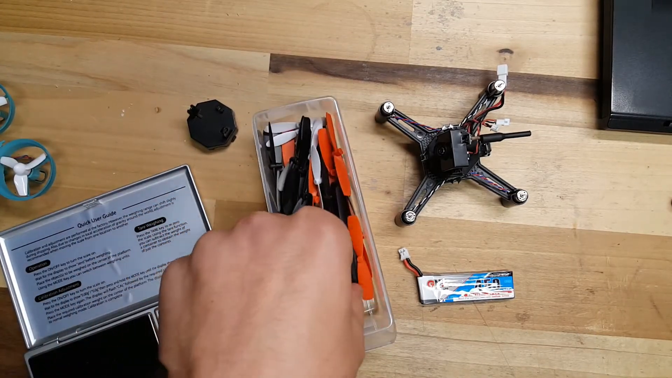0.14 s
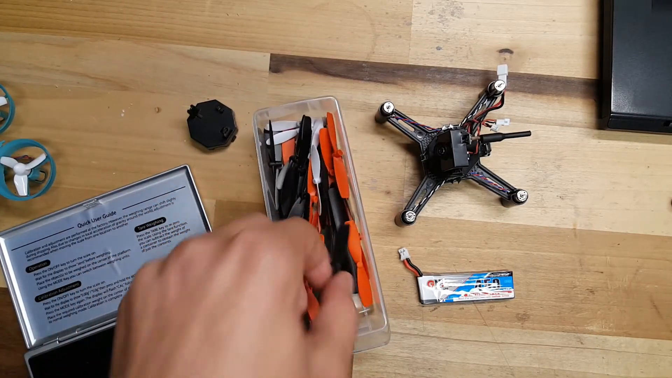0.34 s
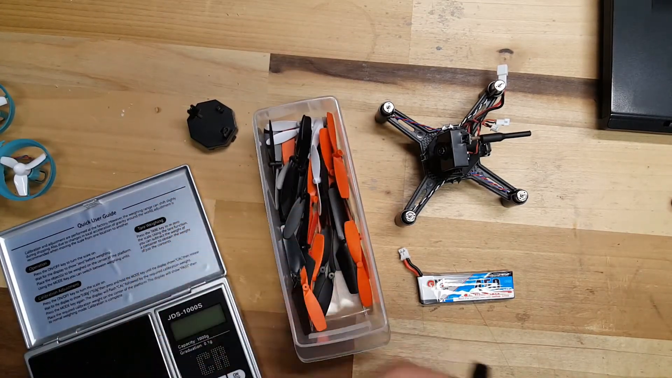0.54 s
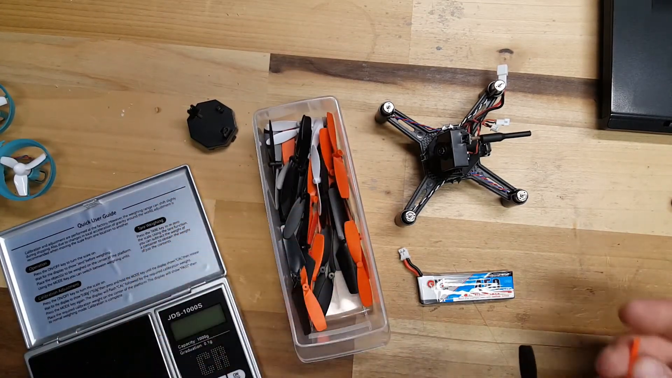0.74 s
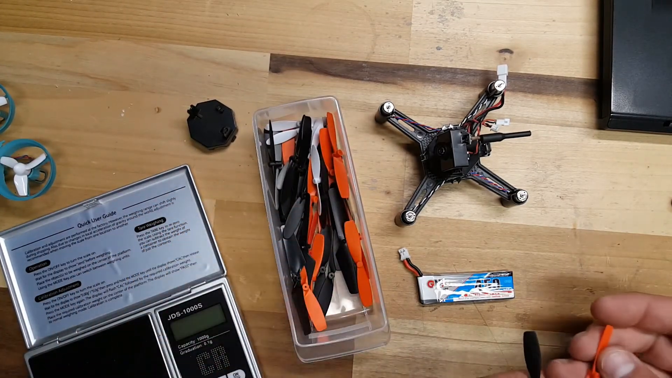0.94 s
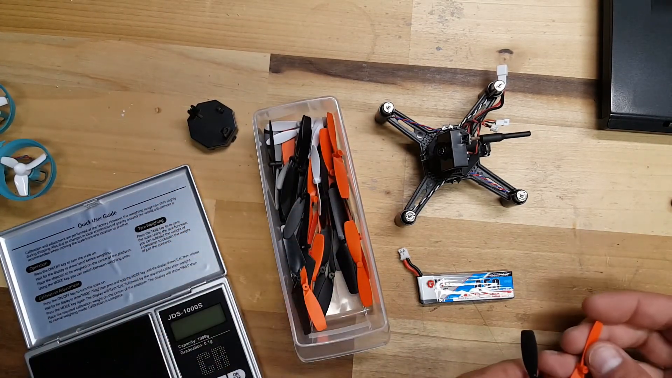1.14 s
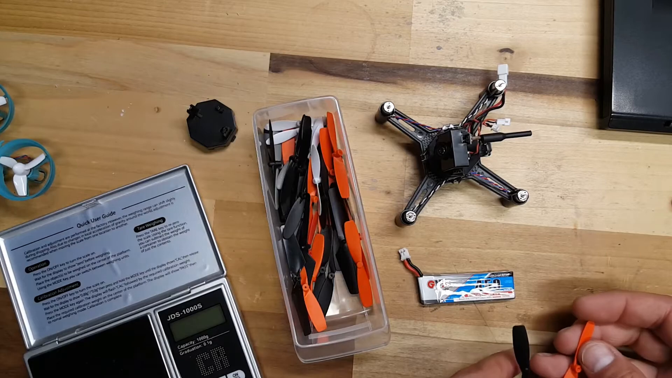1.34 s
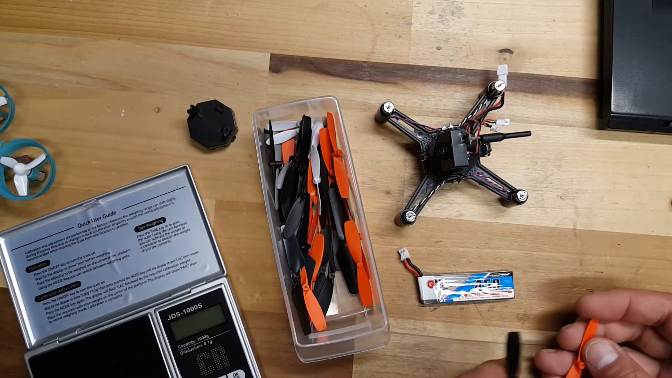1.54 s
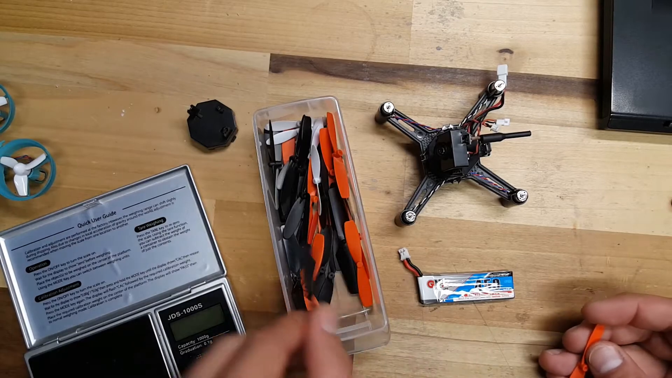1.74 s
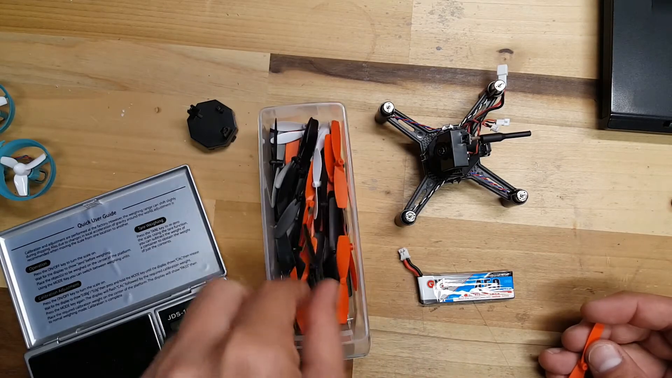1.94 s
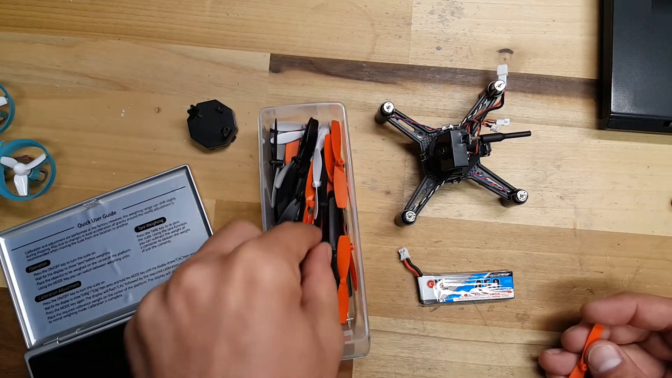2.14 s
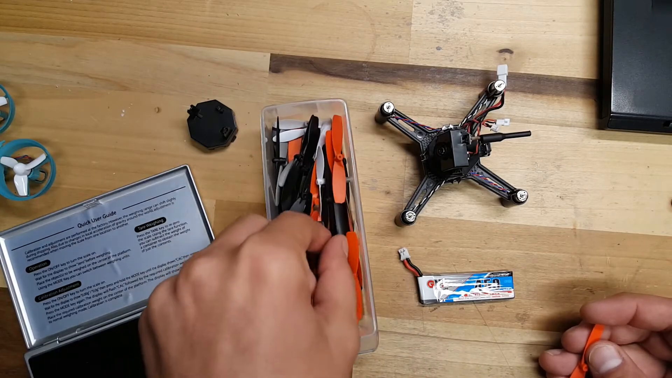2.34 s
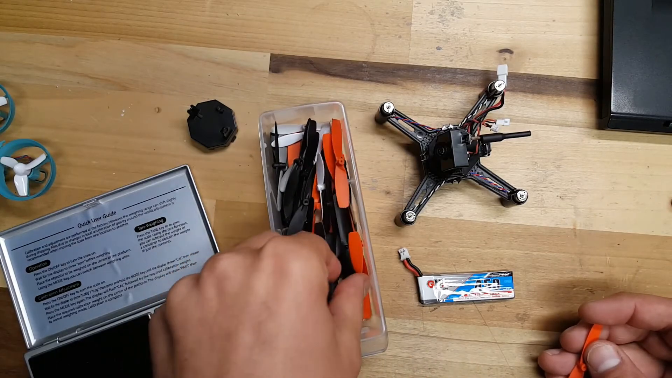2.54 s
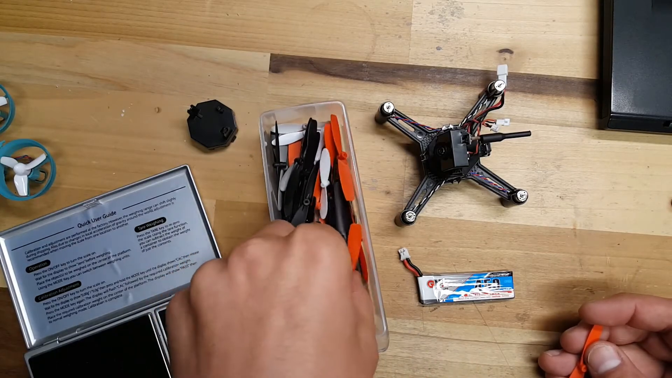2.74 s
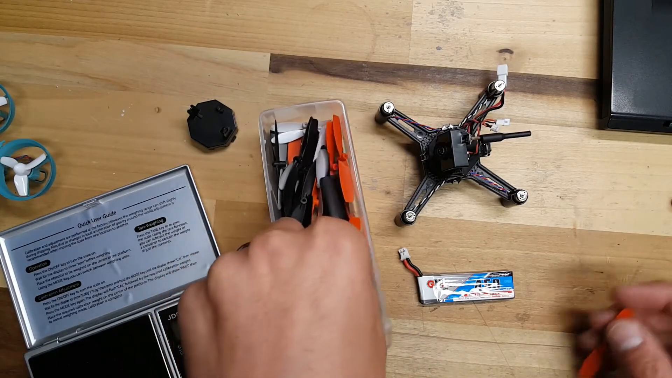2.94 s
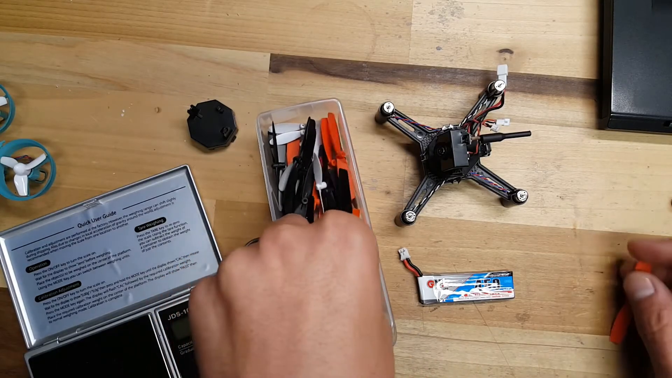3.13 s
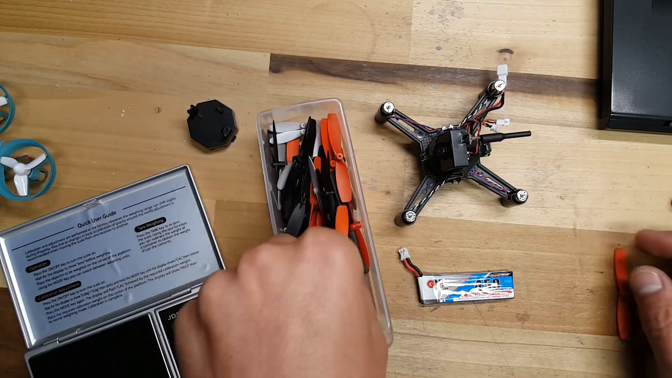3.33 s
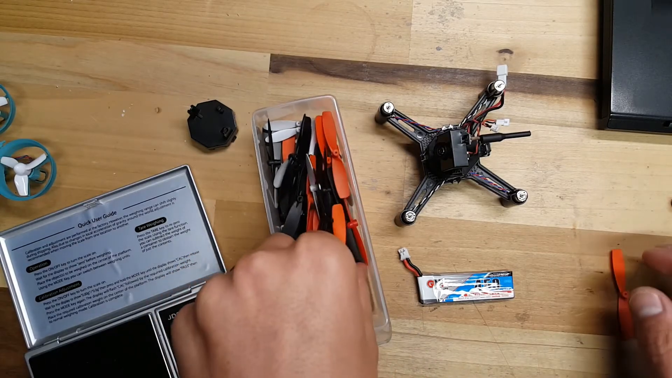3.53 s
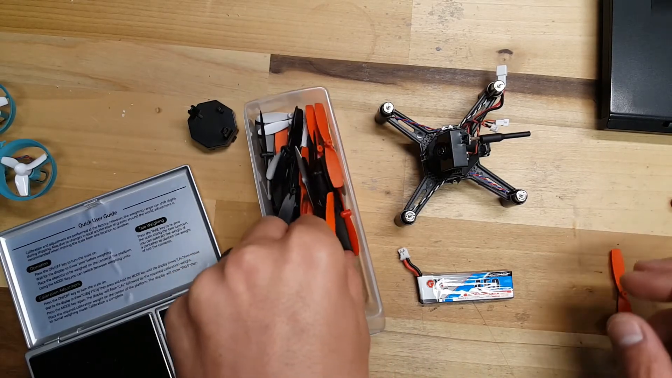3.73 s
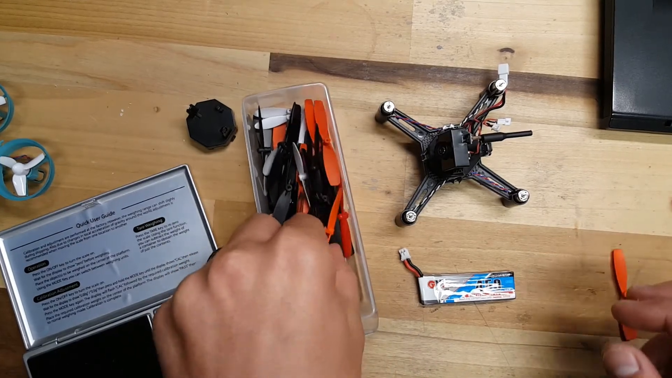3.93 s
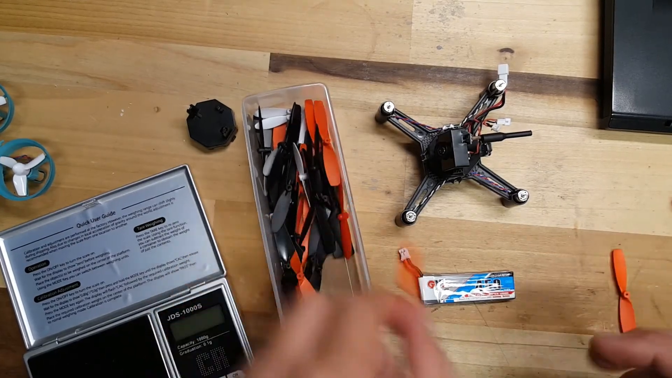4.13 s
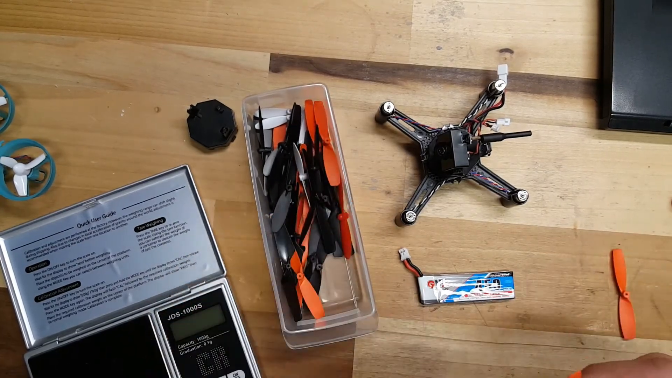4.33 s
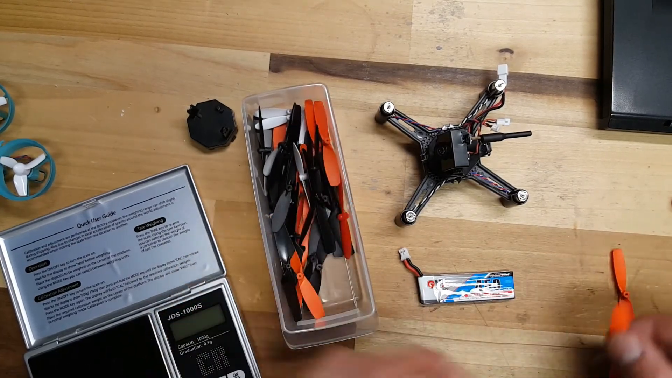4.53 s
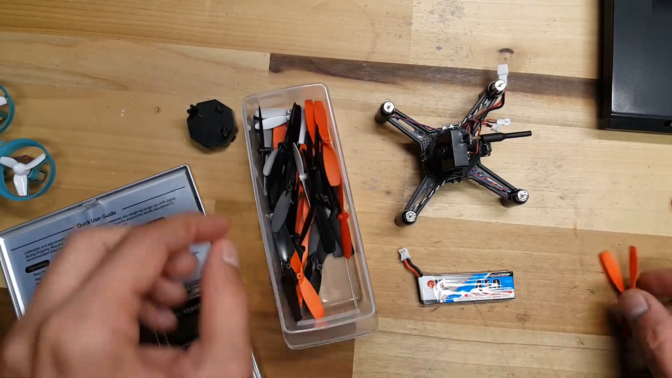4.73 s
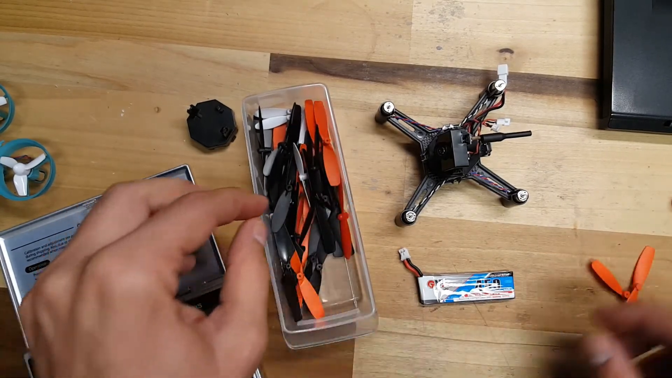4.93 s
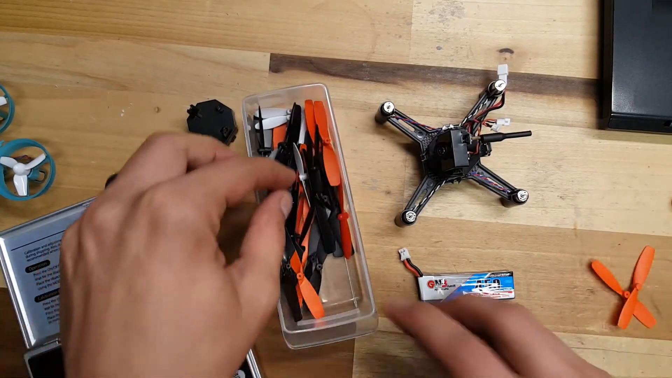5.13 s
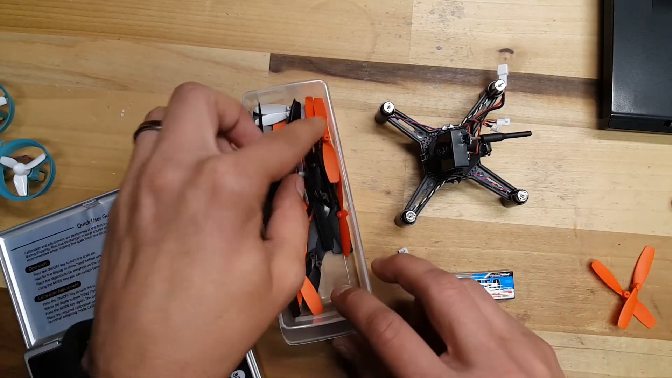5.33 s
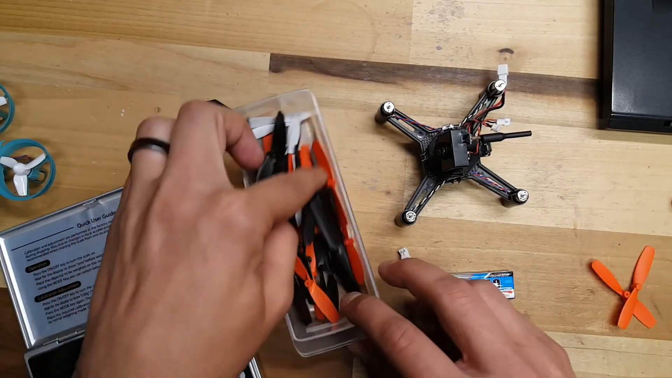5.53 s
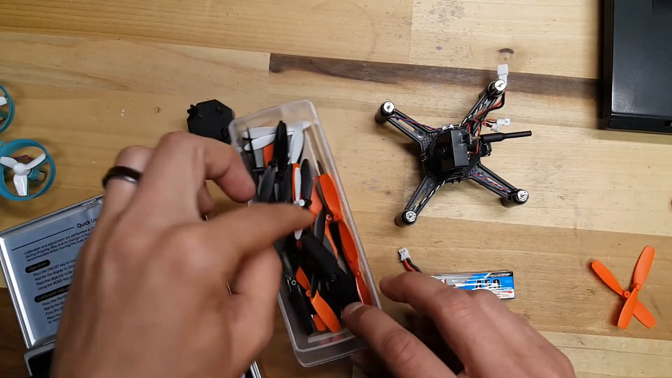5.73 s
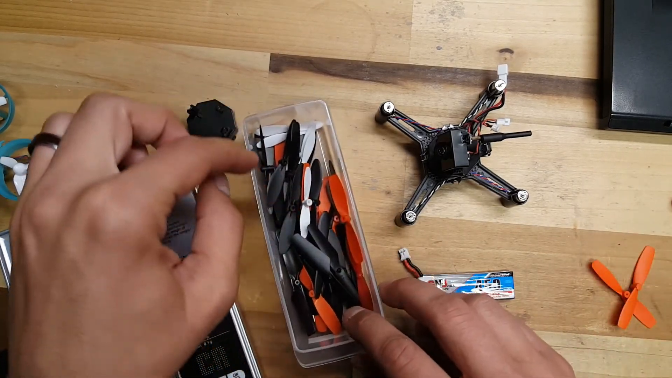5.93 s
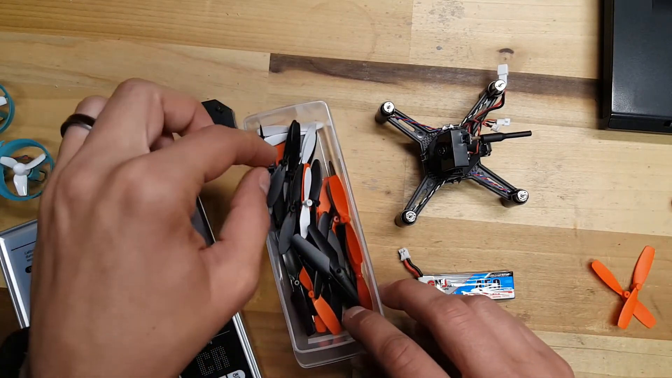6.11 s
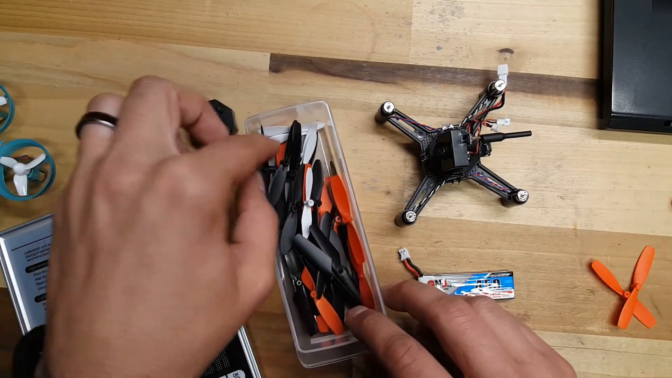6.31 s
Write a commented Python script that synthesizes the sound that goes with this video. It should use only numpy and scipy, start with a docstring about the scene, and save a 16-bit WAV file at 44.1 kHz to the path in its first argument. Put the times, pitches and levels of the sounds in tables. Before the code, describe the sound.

Close stereo pickup in a small quiet room with low rumble and a barely audible ticking fan. Thin plastic propellers click and scrape sharply at once, then pause. A longer busy sorting follows, with brittle clicks, short rasps, hollow box knocks and soft rubbing on the wooden bench. After another pause come a few faint touches, then a final lively flurry that thins out.

```python
"""A small room rumbles low and a distant fan ticks faintly throughout: shaped noise and repeating rattle.
At once, fingers sort small plastic propellers in a thin plastic box on a wooden workbench: blades scrape
(many tiny catches), click (short filtered noise hits) and knock the box (ringing modes), then pause.
From about 1.7 s to 4.1 s they sort busily, the box rubs along the bench and a low hum swells and fades.
A few touches follow near 4.7 s and a last flurry from 5.3 s; two close ports hear it, the left one first."""
import sys
import numpy as np
from scipy import signal
from scipy.fft import rfft, irfft
from scipy.io import wavfile
from scipy.ndimage import uniform_filter1d

SR = 44100
rng = np.random.default_rng(int(sys.argv[2]) if len(sys.argv) > 2 else 0)


def to_wav(sig):
    """Store sig (one row per channel, or 1-D mono) as 16-bit WAV at the path in sys.argv[1].

    Samples outside -1..1 are clipped; the rate is SR.
    """
    pcm = np.clip(np.atleast_2d(sig), -1, 1) * 32767
    pcm = np.round(pcm).astype(np.int16)
    wavfile.write(sys.argv[1], SR, pcm.T)  # frames by channels


N = 285327
TIME = np.arange(N) / SR

# Levels in these tables are relative: a layer's own gain may shift them all together.
# background air noise, its colour: pitch_hz, level_db
AIR_COLOUR = [(110, -20), (180, 0), (230, -5), (280, -3), (450, -14), (600, -11), (800, -13), (1400, -17),
              (2200, -22), (3500, -25), (5000, -32), (7500, -33), (9500, -37), (16000, -35)]
# background rumble, its colour: pitch_hz, level_db
RUMBLE_COLOUR = [(15, -2), (35, -15.5), (55, 4.5), (75, 7.5), (95, 4), (122, 6), (150, -6.5), (200, -34),
                 (300, -45)]
AIR_DB, RUMBLE_DB = -65, -58
# how alike the background is at left and right: pitch_hz, likeness (0 to 1)
LIKENESS = [(60, 1), (150, .93), (400, 0.6), (1000, 0.08), (3000, 0.13), (12000, 0.026)]
# steady whines in the background: pitch_hz, width_hz, level_db
WHINES = [(261, 15, -77.5), (562, 24, -85), (1168, 75, -77.5), (1498, 160, -76), (6960, 300, -90)]
# a low hum swells and fades: time_s, level_db
HUM_LEVEL = [(1.8, -85), (2.45, -55), (2.9, -59), (3.25, -69)]
HUM_HZ = 117.8
# ticks in each turn of the fan: share_of_turn (0 to 1), level_db
FAN_TICKS = [(.4, -1), (.92, 0)]
# ringing of the fan's housing: pitch_hz, width_hz, level_db
FAN_RINGS = [(1230, 54, -24), (1710, 51, 3.5), (2400, 340, 1.5), (3300, 430, 1.5)]
# a finger pushes blades over each other: start_s, length_s, level_db, swell_db (from start to end)
SLIDES = [ (0.0, 0.083, -46, 0), (0.024, 0.069, -55.5, 9), (0.167, 0.051, -52, 11),
          (1.678, 0.21, -61, 16.5), (1.892, 0.057, -44.5, -8), (1.95, 0.019, -57, -17),
          (2.194, 0.036, -43.5, 8.5), (2.257, 0.041, -48.5, 7), (2.461, 0.016, -46, -3),
          (2.506, 0.028, -45, 4), (2.574, 0.14, -44, 11.5), (2.731, 0.081, -51, 15), (2.859, 0.087, -60, 9),
          (2.956, 0.032, -41, 5.5), (3.013, 0.084, -53, -6), (3.127, 0.034, -44, 23),
          (3.261, 0.024, -54.5, 16), (3.287, 0.063, -43, -4.5), (3.417, 0.033, -40.5, 10),
          (3.467, 0.016, -40, -3), (3.582, 0.08, -52, 3), (3.69, 0.076, -51.5, 8),
          (3.806, 0.027, -46.5, 12), (3.856, 0.012, -42.5, 0.5), (3.911, 0.017, -42, -9),
          (3.981, 0.025, -48.5, -4), (5.286, 0.039, -59.5, 15), (5.361, 0.042, -43, 7.5),
          (5.41, 0.049, -44, -9), (5.466, 0.085, -36, 2.5), (5.581, 0.053, -40.5, 10),
          (5.645, .08, -48.5, 5), (5.774, 0.038, -49, 2), (5.81, .012, -41, 5.5), (6.392, .07, -51.5, 20)]
# colour of a slide: pitch_hz, level_db
SLIDE_COLOUR = [(300, -10), (800, -8), (1250, -5.5), (2000, -1), (3300, -3), (4300, -5.5), (6000, -7),
                (7500, -7.5), (9000, -20.5), (10500, -23), (12000, -20), (16000, -26.5)]
# resonances of the heap of blades in its box: pitch_hz, width_hz, boost_db
HEAP = [(1618, 39, 7.5), (2106, 120, 3.5), (2620, 110, 3.5), (2790, 150, 1), (3240, 300, 6),
        (3320, 220, 0.5), (3780, 110, 1.5), (4730, 110, 7)]
# blade hits blade: start_s, level_db, pitch_hz (strongest mode), treble_db (extra), edge_tick_db
CLICKS = [ (0.0483, -35.5, 3530, -7, -43.5), (0.0506, -28.5, 4950, 2, -47), (0.072, -44, 3260, -3, -66),
          (0.1928, -38.5, 3180, 2, -53), (1.8948, -34, 1290, 7, -46), (1.8988, -23, 1350, -6.5, -58),
          (1.9098, -38, 3440, 0, -56), (1.9427, -29, 3440, 5.5, -43), (1.944, -27.5, 2070, -4.5, -62),
          (2.209, -45.5, 3230, 15, -56), (2.23, -31, 1710, 0, -47), (2.243, -37.5, 1560, -11, -50),
          (2.306, -46, 1530, -3, -59), (2.466, -44, 1220, -2, -67), (2.504, -28, 3560, -0.5, -46),
          (2.5165, -30.5, 2140, 0, -57), (2.531, -32.5, 2140, 4, -54), (2.668, -39.5, 3520, 5, -58),
          (2.686, -34, 3680, 9, -54), (2.702, -38, 3190, -2, -60), (2.777, -42, 3570, 8, -67),
          (2.8196, -31, 1770, -1.5, -44.5), (2.969, -44, 1700, -1, -56), (2.978, -44, 3230, 20, -53),
          (3.085, -42, 1570, 5, -70), (3.117, -46, 2080, -13, -74), (3.158, -31.5, 1630, 4, -43.5),
          (3.225, -46, 3160, -7, -78), (3.2922, -40.5, 3130, 8, -50.5), (3.331, -40.5, 3430, 1, -67),
          (3.351, -40.5, 2250, -14, -74), (3.422, -42, 3230, 4, -62), (3.438, -43, 2080, -5, -54),
          (3.4686, -31, 1940, -3, -48), (3.514, -39, 2190, -3, -61), (3.56, -42.5, 3200, -4, -65),
          (3.7333, -44, 3200, -5, -55), (3.8519, -37, 1600, -1, -49), (3.913, -39, 3240, 5, -51),
          (3.928, -40.5, 1490, -5, -54), (4.0249, -44.5, 1450, 3, -57), (4.713, -56.5, 3900, 1, -64),
          (4.7825, -47.5, 4200, 9, -49.5), (5.405, -37, 3100, 2, -59), (5.434, -38.5, 1780, -2, -61),
          (5.462, -38, 1660, 12, -49), (5.475, -35.5, 2860, -21, -54), (5.49, -33.5, 3030, 18, -59),
          (5.511, -32.5, 4000, 26, -55), (5.519, -31.5, 3140, 6.5, -52), (5.543, -46, 2090, -2, -53),
          (5.624, -39, 1630, -3, -60), (5.677, -40.5, 1460, -1, -60), (5.7143, -44.5, 1570, 8, -52.5),
          (5.81, -37, 2080, 4, -46), (5.868, -47, 2040, -5, -71), (6.433, -46, 2300, 16, -65),
          (6.464, -40, 3250, 18, -57)]
# colour of a blade click: pitch_hz, level_db
CLICK_COLOUR = [(300, -17), (800, -15), (1300, -9.5), (2000, -5.5), (2700, -4), (3400, -4), (4200, -5),
                (5000, -5), (6000, -7), (7500, -5.5), (9000, -30), (16000, -36.5)]
# colour of the crisp edge tick in a click: pitch_hz, level_db
TICK_COLOUR = [(3000, -32), (8000, 4), (10000, -5.5), (12000, 0), (14000, -3), (16000, -5)]
# the box wall or bottom is bumped: start_s, level_db, hardness_db (applied partly, most in the upper modes)
KNOCKS = [ (0.049, -38.5, 18), (0.071, -46, -1), (0.2418, -45, -5), (1.838, -51.5, -1), (1.8956, -24.5, 22),
          (1.9075, -35.5, -1), (1.9449, -38.5, 31), (2.239, -44.5, -4), (2.4625, -39.5, 6),
          (2.5512, -38.5, -8), (2.817, -46.5, 4), (2.998, -48.5, -16), (3.292, -45, 18), (3.4365, -33.5, 3),
          (3.444, -44, 42), (3.47, -47, 2), (3.556, -40, -2), (3.668, -48.5, -18), (4.026, -47, 25),
          (4.742, -56, 8), (4.763, -52.5, 8), (4.782, -60, 9), (5.314, -49.5, -25), (5.33, -48, -23),
          (5.4, -44.5, 3), (5.49, -53, -3), (5.912, -53, -9), (5.98, -53, -15), (6.334, -54, -2),
          (6.431, -49, 12)]
# modes of the box on the bench: pitch_hz, level_db, t60_s (time to fall by 60 dB)
BOX_MODES = [(183, -11.5, 0.12), (387.4, -25, 0.48), (461.3, -6, 0.12), (585.7, -1.5, 0.095),
             (668, -5.5, 0.049), (763, -9, 0.093), (933, -6.5, 0.028), (1066, -2.5, 0.033),
             (1340, 6, 0.015), (1580, -8, 0.029), (2030, -7, 0.046), (2130, -11.5, 0.036)]
# colour of the box's dull crack and of its rub: pitch_hz, level_db
BOX_COLOUR = [(100, -8.5), (250, -15), (450, -1), (600, -5), (850, -3), (1300, -10), (2200, -15),
              (4000, -13), (9000, -76)]
# the box is shoved along the bench: start_s, length_s, level_db
DRAGS = [ (2.464, 0.023, -45.5), (2.538, 0.042, -53), (2.804, 0.02, -47), (2.965, 0.035, -48.5),
         (3.057, 0.27, -57), (3.598, 0.3, -55), (4.748, 0.061, -55.5), (5.3, 0.037, -51),
         (5.378, 0.18, -51.5), (5.564, 0.25, -58), (6.407, 0.027, -52)]
# how long the room rings: pitch_hz, t60_s
ROOM_T60 = [(200, 0.3), (1000, 0.47), (3000, 0.34), (7000, 0.27), (15000, 0.44)]

GRIP_S = 0.0088  # time for a push to take hold
BLADES_SETTLE_S, BOX_SETTLE_S = 0.086, 0.11  # time to fall by 60 dB once a push ends
PORT_LAG_S = 0.00007
EDGE_HZ = 16300


def amp(db):
    """Turns decibels into gain."""
    return 10 ** (np.asarray(db) / 20)


def fade(t, t60):
    """Gain that falls by 60 dB in t60 seconds."""
    return amp(-60 * t / t60)


def unit(x):
    """Scales to an rms (average strength) of one."""
    return x / np.sqrt(np.mean(x ** 2) + 1e-20)


def struck(x, size=176):
    """Scales a hit so that its loudest stretch of size samples has an rms of one."""
    return x / np.sqrt(uniform_filter1d((x ** 2).mean(0), size).max())


def read(points, hz):
    """Reads a table between its points, on a logarithmic pitch axis."""
    f, value = np.transpose(points)
    return np.interp(np.log(hz + 1), np.log(f + 1), value)


def bells(rows, hz):
    """Sum of bell-shaped resonance curves, from rows of pitch_hz, width_hz, height."""
    return sum(height / (1 + (2 * (hz - f) / width) ** 2) for f, width, height in rows)


def colour(x, db_at, size=4096):
    """Filters x by the gain db_at(hz) in dB, without any sound before its cause."""
    log_gain = np.log(amp(db_at(abs(np.fft.fftfreq(size, 1 / SR)))))
    # the Hilbert transform gives the phase that puts the energy as early as possible
    response = np.exp(np.conj(signal.hilbert(log_gain)))
    taps = np.fft.ifft(response).real[:size // 2]
    return signal.fftconvolve(x, taps[None], axes=1)[:, :x.shape[1]]


def ports(same, size):
    """White noise at the two ports, sharing the part same (0 to 1) of its power."""
    shared = rng.standard_normal(size)
    separate = rng.standard_normal((2, size))
    return np.sqrt(same) * shared + np.sqrt(1 - same) * separate


def add(mix, s, sound):
    """Mixes a stereo sound in at time s."""
    part = mix[:, max(round(s * SR), 0):][:, :sound.shape[1]]
    part += sound[:, :part.shape[1]]


def background(hum_waver=0.014):
    """Noise shaped into low rumble, soft air and faint whines, plus a sine hum of wavering pitch."""
    hz = np.fft.rfftfreq(N, 1 / SR)
    left, other = rfft(rng.standard_normal((2, N)))
    same = np.clip(read(LIKENESS, hz), 0, 1)
    right = same * left + np.sqrt(1 - same ** 2) * other
    noise = np.array([left, right])

    air = amp(AIR_DB) * unit(amp(read(AIR_COLOUR, hz)))
    rumble = amp(RUMBLE_DB) * unit(amp(read(RUMBLE_COLOUR, hz)))
    power = air ** 2 + rumble ** 2
    for f, width, db in WHINES:
        whine = amp(db) * unit(bells([(f, width, 1)], hz))
        power += whine ** 2

    waver = unit(uniform_filter1d(rng.standard_normal(N), size=6000))
    hum_pitch_hz = HUM_HZ * (1 + hum_waver * waver)
    hum = np.sqrt(2) * np.sin(2 * np.pi * np.cumsum(hum_pitch_hz) / SR)
    # silent outside the table's times
    hum_db = np.interp(TIME, *np.transpose(HUM_LEVEL), left=-np.inf, right=-np.inf)
    return irfft(noise * np.sqrt(power), N) + amp(hum_db) * hum


def fan(db=-78.5, turns_per_s=16.45, tick_s=0.005):
    """Short puffs of rattle, repeating with each turn, ring the fan's housing."""
    turn_s = 1 / turns_per_s
    ticks = np.zeros(N)
    for share, tick_db in FAN_TICKS:
        since_tick = (TIME - share * turn_s) % turn_s
        ticks += amp(tick_db) * np.exp(-since_tick / tick_s)
    rings = [(f, width, amp(ring_db) ** 2) for f, width, ring_db in FAN_RINGS]
    rattle = colour(ticks * ports(0.4, N), lambda f: 10 * np.log10(bells(rings, f)))
    return amp(db) * unit(rattle)


def push(start, length, db, swell_db=0, *, settle_s):
    """Gain over time of one push: it takes hold, swells or eases with the pressure, then settles."""
    t = TIME - start
    grip = np.clip(t / GRIP_S, 0, 1)
    pressure_db = swell_db * (np.clip(t / length, 0, 1) - 0.5)
    return grip * amp(db + pressure_db) * fade(np.maximum(t - length, 0), settle_s)


def heap_db(hz):
    """Resonant boost of the heap of blades inside the box."""
    return bells(HEAP, hz)


def blade_db(own, hz, depth_db=9, width_hz=260):
    """A blade's own higher modes, placed by the chance numbers own (0 to 1)."""
    return bells([(1200 * 7 ** place, width_hz, depth_db) for place in own], hz)


def friction(per_s, spread_db, ring_t60, same, shift_db, count=12, size=1024):
    """Stick and slip: tiny catches ring at contact points, and the load wanders between these points."""
    out, t = np.zeros((2, N)), np.arange(size) / SR
    moments = np.linspace(0, N / SR, N // 1500)
    wander = [np.interp(TIME, moments, rng.standard_normal(len(moments))) for _ in range(count)]
    load = amp(shift_db * np.array(wander))
    for share in load / np.linalg.norm(load, axis=0):
        happens = rng.random(N) < per_s / count / SR
        strength = amp(spread_db * np.minimum(rng.exponential(1, N), 3))
        own = rng.random(size=4)
        ring = colour(ports(same, size) * fade(t, ring_t60), lambda f: blade_db(own, f))
        catches = share * happens * strength
        out += signal.oaconvolve(catches[None], unit(ring), axes=1)[:, :N]
    return out


def slides(gain_db=-2):
    """Blade edges scrape over each other as fingers push them: a fine rasp with coarser catches in it."""
    rasp = friction(per_s=2200, spread_db=0.0, ring_t60=0.023, same=0.22, shift_db=4)
    catches = friction(per_s=240, spread_db=3, ring_t60=0.012, same=0.55, shift_db=2.5)
    grains = unit(rasp) + unit(catches)
    scrape = unit(colour(grains, lambda f: read(SLIDE_COLOUR, f) + heap_db(f)))
    pushes = sum(push(*row, settle_s=BLADES_SETTLE_S) for row in SLIDES)
    return amp(gain_db) * pushes * scrape


def clicks(snap=4.9, mode_db=8, mode_width_hz=700, walls_t60=0.045,
           ring_db=-19, ring_t60=0.038, same=0.17, tick_t60=0.038, size=4096, count=5):
    """A sharp contact echoes briefly between the box walls; the whole heap rings faintly with it."""
    out, t = np.zeros((2, N)), np.arange(size) / SR

    def heap(f):
        return read(CLICK_COLOUR, f) + heap_db(f)

    for s, db, hz, treble_db, edge_db in CLICKS:
        contact = ports(same, size) * fade(t, walls_t60)
        contact[:, 0] += snap  # one sharp sample at the moment of touch
        own = rng.random(count)

        def hit_db(f):
            own_modes = blade_db(own, f, depth_db=5.0, width_hz=190)
            strongest = bells([(hz, mode_width_hz, mode_db)], f)
            treble = treble_db * read([(2500, 0), (6000, 1)], f)
            return heap(f) + own_modes + strongest + treble

        hit = colour(contact, hit_db)
        ring = colour(ports(same, size) * fade(t, ring_t60), heap)
        tick = colour(ports(same, size) * fade(t, tick_t60), lambda f: read(TICK_COLOUR, f))
        add(out, s, amp(db) * (struck(hit) + amp(ring_db) * struck(ring)))
        add(out, s, amp(edge_db) * struck(tick, size=66))
    return out


def knocks(gain_db=-1, crack=0.97, crack_t60=0.036, vary_db=1, size=8192):
    """A blow rings the box's modes, a little differently each time, under a short dull crack."""
    out, t = np.zeros((2, N)), np.arange(size) / SR
    mode_hz, mode_db, t60 = np.transpose(BOX_MODES)[:, :, None]
    sign = (-1) ** np.arange(len(BOX_MODES))[:, None]  # neighbouring modes push the air in opposite directions
    modes = sign * fade(t, t60) * np.sin(2 * np.pi * mode_hz * t)

    def upper(f):
        return read([(600, 0.38), (1100, 0.79)], f)

    for s, db, hard_db in KNOCKS:
        spot_db = vary_db * rng.standard_normal(mode_hz.shape) + hard_db * upper(mode_hz)
        ring = (amp(mode_db + spot_db) * modes).sum(0)
        burst = colour(ports(0.7, size) * fade(t, crack_t60),
                       lambda f: read(BOX_COLOUR, f) + hard_db * upper(f))
        blow = struck(ring[None]) + crack * struck(burst)
        add(out, s, amp(db + gain_db) * struck(blow))
    return out


def drags(gain_db=-6, thrum_db=-8):
    """The box bottom rubs on the wood by stick and slip, and the bench top thrums under it."""
    grains = friction(per_s=800, spread_db=2, ring_t60=0.012, same=0.8, shift_db=3)
    rub = unit(colour(grains, lambda f: read(BOX_COLOUR, f)))
    bench_colour = [(60, -37.5), (140, 16), (220, -28.5), (400, -6), (1500, -79)]  # pitch_hz, level_db
    thrum = unit(colour(ports(0.95, N), lambda f: read(bench_colour, f)))
    shoves = sum(push(*row, settle_s=BOX_SETTLE_S) for row in DRAGS)
    return amp(gain_db) * shoves * (rub + amp(thrum_db) * thrum)


def room(x, delay_s=0.0014):
    """Diffuse tail of a small room: fading noise, each band dying at its own speed."""
    hz, t, bands = signal.stft(rng.standard_normal((2, SR // 2)), SR, nperseg=256)
    tail = signal.istft(bands * fade(t, read(ROOM_T60, hz)[:, None]), SR, nperseg=256)[1]
    # silent for delay_s, then fades in over the same time
    tail *= np.clip(np.arange(tail.shape[1]) / SR / delay_s - 1, 0, 1)
    return signal.fftconvolve(x, tail / np.linalg.norm(tail[0]), axes=1)[:, :N]


def scene(room_db=-12, left_db=0.62):
    """The box lies a little to the left, so the right port hears it later and softer."""
    left, right = clicks() + knocks() + slides() + drags()
    hz = np.fft.rfftfreq(N, 1 / SR)
    right = irfft(rfft(right) * np.exp(-2j * np.pi * hz * PORT_LAG_S), N)  # delay by PORT_LAG_S
    direct = np.array([left * amp(left_db), right * amp(-left_db)])
    return direct + amp(room_db) * room(direct) + background() + fan()


def record(dry):
    """A steep low-pass filter removes the treble above EDGE_HZ."""
    taps = signal.firwin(511, EDGE_HZ, window=("kaiser", 9), fs=SR)
    return signal.oaconvolve(dry, taps[None], "same")


dry = scene()
out = record(dry)
to_wav(out)
```